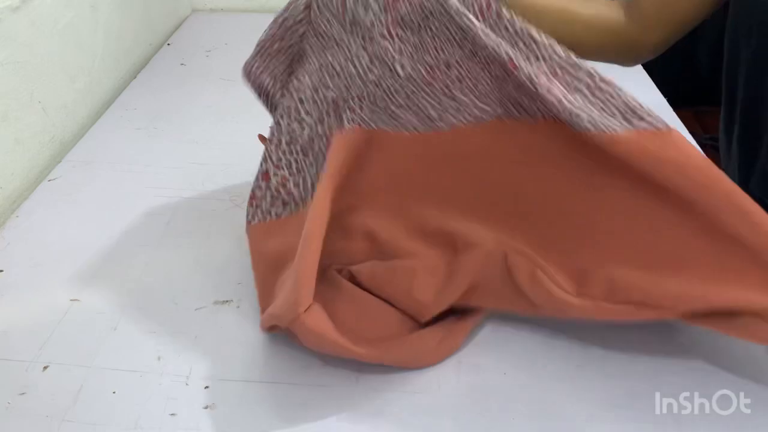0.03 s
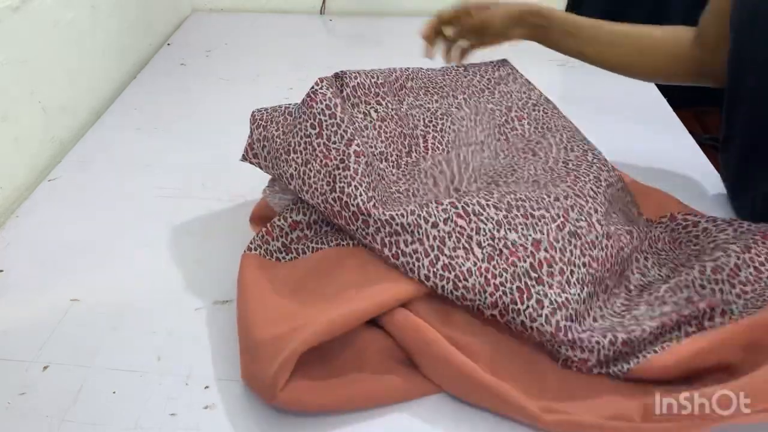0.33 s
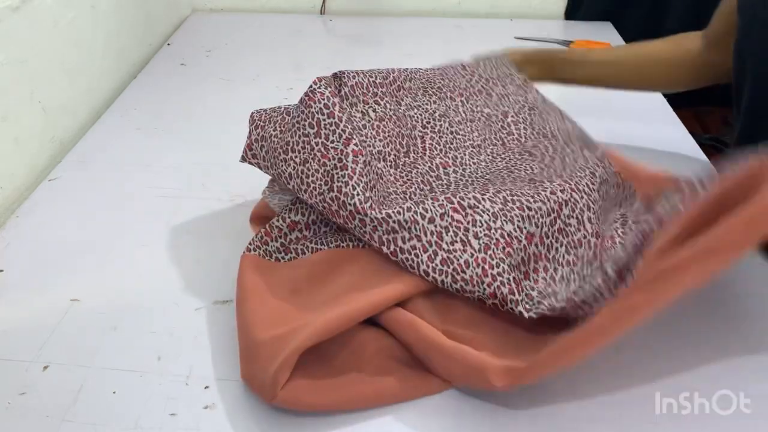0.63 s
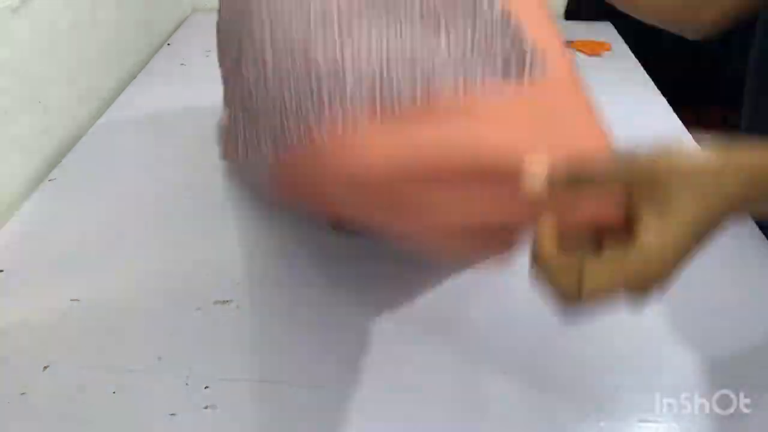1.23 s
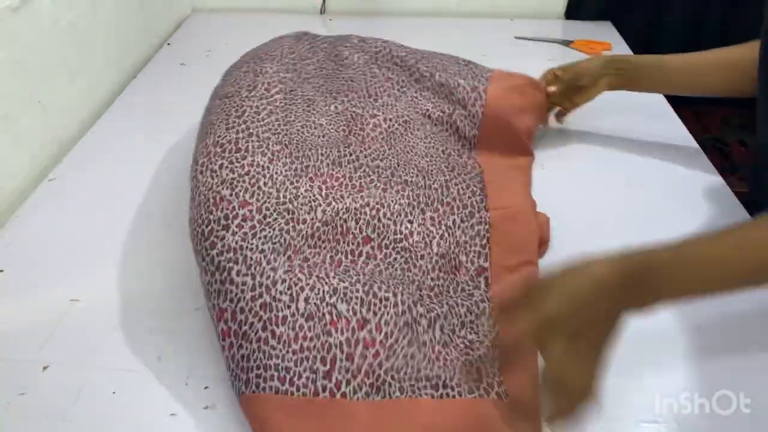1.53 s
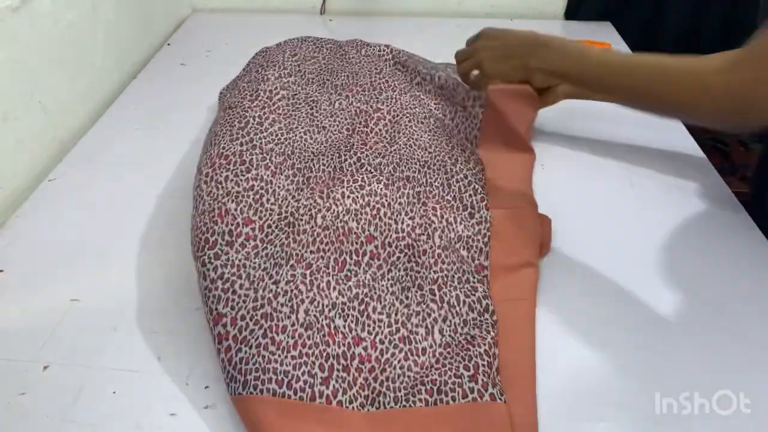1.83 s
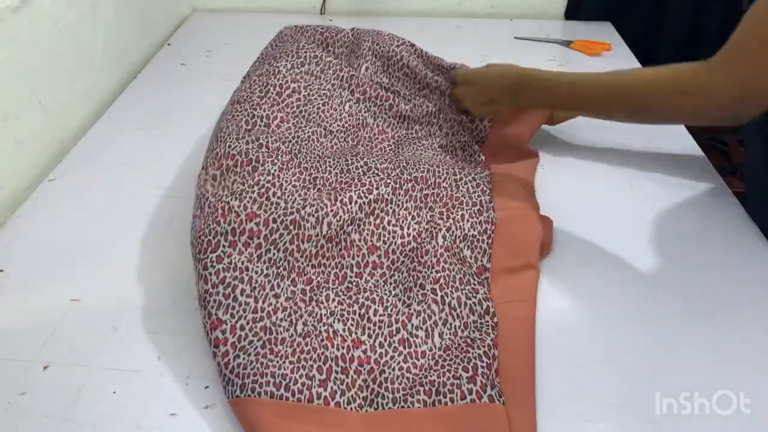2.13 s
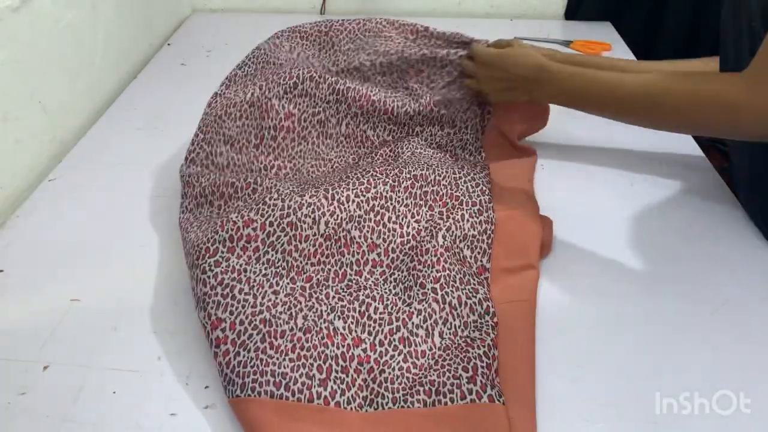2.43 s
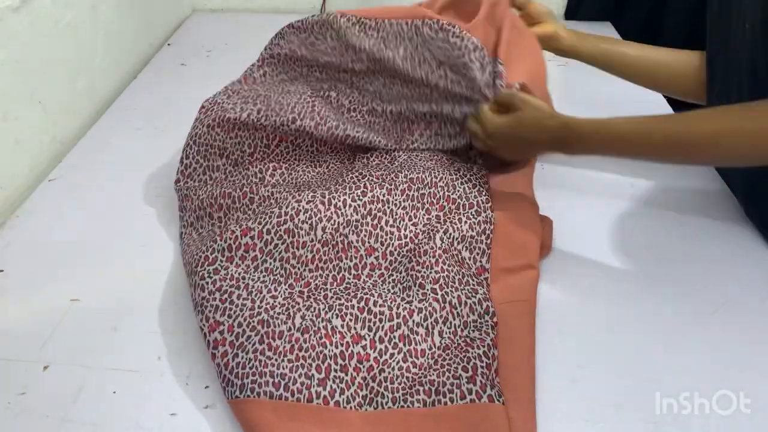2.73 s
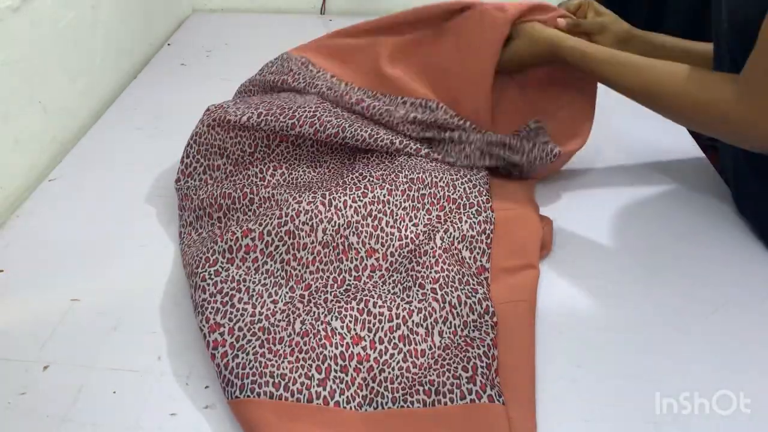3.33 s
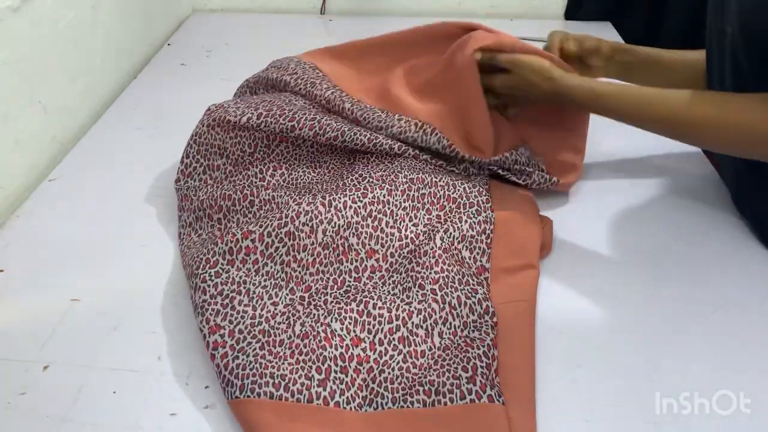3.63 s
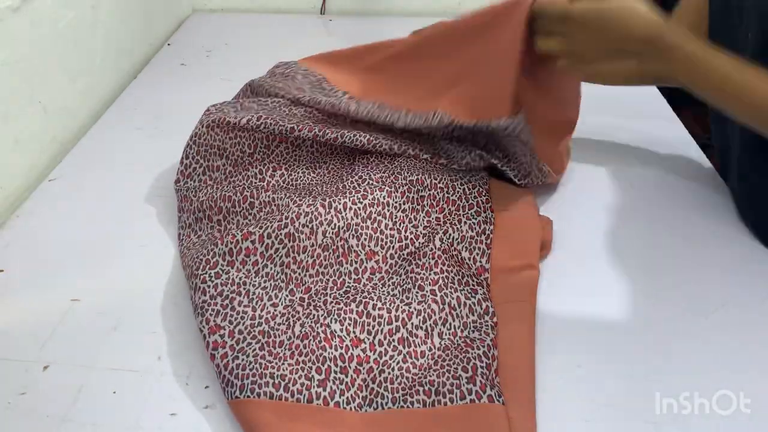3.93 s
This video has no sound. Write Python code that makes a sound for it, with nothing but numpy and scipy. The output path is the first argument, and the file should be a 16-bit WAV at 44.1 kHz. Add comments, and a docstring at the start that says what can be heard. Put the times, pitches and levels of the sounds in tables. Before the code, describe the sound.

Cloth rustles close to the microphone as it is lifted, shaken out with a few quick flaps and dropped on a table, then smoothed by hand. The room is small and quiet, with a low engine drone outside.

```python
"""Sliding threads hiss and moving folds flutter as a cloth is lifted near a stereo microphone.
It is shaken out, dropped on a table and smoothed by hand in a small, quiet room; the sheet pushes
out pulses of air, flapping as it snaps taut and lands. Farther off, a low drone, probably an engine
outside, swells and fades through the walls over soft room noise."""
import sys
import numpy as np
from scipy import signal
from scipy.fft import rfft, irfft
from scipy.io import wavfile
from scipy.ndimage import uniform_filter1d

SR = 44100
rng = np.random.default_rng(int(sys.argv[2]) if len(sys.argv) > 2 else 0)


def pcm_store(signal):
    """Save signal as 16-bit PCM."""
    levels = np.round(np.clip(np.atleast_2d(signal), -1, 1) * 32767)
    wavfile.write(sys.argv[1], SR, levels.astype(np.int16).T)


N = 176400
BIN_HZ = np.fft.rfftfreq(N, 1 / SR)


# The crack of the weave. Each row: frequency in Hz, relative level in dB.
CRACK_SPECTRUM = [(300, 1), (1400, 8), (2700, -4), (4000, 7.5), (5500, -10), (7700, -16), (9700, -11),
                  (13000, -29), (15500, -25)]
# Flaps and pats near the microphone. Each row: start in seconds, relative level in dB,
# starting pitch in Hz, crack against the flap in dB, left over right in dB.
FLAP_HITS = [(0.641, -36, 1120, -13, 1), (.904, -31.5, 890, -22, -3), (0.920, -37.5, 1160, -24, 6),
             (0.935, -31.5, 417, -34, -1), (1.172, -35.5, 1399, -20, 3), (1.310, -39, 1700, -20, 6),
             (1.3367, -21.5, 1240, -35, 2), (1.344, -29, 380, -16, -3), (1.4682, -16.5, 1530, -16.5, 1.5),
             (1.481, -28, 1100, -10.5, -2), (1.4837, -20.5, 242, -32, 0), (1.933, -42.5, 1500, -24, 3),
             (2.678, -24, 277, -38, -2), (3.949, -34.5, 517.6, -41, -4)]

def flaps():
    """Each flap pushes out a pulse of air that falls in pitch, with a brief crack of the weave."""
    attack_s, decay_s, crack_s = .0003, .0028, .0012
    sag_s, end_hz = .0015, 140
    out, t = np.zeros((2, N + SR)), np.arange(SR // 20) / SR
    envelope = (1 - np.exp(-t / attack_s)) * np.exp(-t / decay_s)
    weave = unit(colour(rng.standard_normal(N), CRACK_SPECTRUM))
    for start, db, start_hz, crack_db, pan_db in FLAP_HITS:
        i = int(start * SR)
        pitch = end_hz + (start_hz - end_hz) * np.exp(-t / sag_s)
        push = np.sin(2 * np.pi * np.cumsum(pitch) / SR) * envelope
        crack = undb(crack_db) * np.roll(weave, -i)[:len(t)] * np.exp(-t / crack_s)
        sides_db = np.array([[pan_db], [-pan_db]]) / 2
        out[:, i:i + len(t)] += (push + crack) * undb(db - 2 + sides_db)
    low_cut = signal.butter(2, 80, "high", fs=SR, output="sos")  # the flaps carry little bass
    return signal.sosfilt(low_cut, out[:, :N])


# The dull tone of the folds. Each row: frequency in Hz, relative level in dB.
FLUTTER_SPECTRUM = [(20, -34), (50, -7.5), (120, 6.5), (220, 0.5), (330, -1), (470, -2), (620, -8.5),
                    (1000, -10.5), (1500, -15), (2200, -19), (4000, -28.5), (6000, -36), (12000, -55)]
# How strongly the folds move. Each row: time in seconds, relative level in dB.
FOLD_LEVELS = [(0, -58.5), (.25, -59.5), (.58, -60), (.66, -49), (.76, -54), (.8, -54.5), (.86, -53),
               (.92, -50), (1, -57), (1.13, -61.5), (1.2, -53), (1.29, -51), (1.325, -42), (1.348, -40.5),
               (1.375, -43.5), (1.4, -48), (1.435, -48.5), (1.472, -45), (1.497, -44), (1.55, -54),
               (1.65, -63), (2.62, -60.5), (2.69, -47.5), (2.79, -66), (3.1, -69), (3.32, -55.5),
               (3.45, -75), (3.8, -86), (3.95, -71), (4, -66)]
# The folds across the microphone pair. Each row: frequency in Hz, left-right correlation.
FOLD_CORRELATION = [(100, 0.99), (300, 0.96), (700, 0.6), (2000, 0.33), (6000, 0.13)]

def folds():
    """Creases buckle in dull little pops as the folds move."""
    pops = spread(grains(per_s=2200, scatter_db=1.5), FOLD_CORRELATION)
    flutter = unit(colour(pops, FLUTTER_SPECTRUM))
    return flutter * undb(curve(FOLD_LEVELS) + .5 + 2 * walk(per_s=50))


# The threads across the microphone pair. Each row: frequency in Hz, left-right correlation.
THREAD_CORRELATION = [(1000, 0.15), (4000, 0.061), (6500, 0.063), (9000, 0.11), (12000, 1)]

def threads(lag_s=.000295):
    """Dense slips of thread on thread; the left channel runs a fixed moment behind the right."""
    left, right = spread(grains(per_s=9000, scatter_db=1.5), THREAD_CORRELATION)
    return np.array([np.roll(left, round(lag_s * SR)), right])


# The hiss at close range. Each row: frequency in Hz, relative level in dB.
HISS_SPECTRUM = [(500, 6.5), (1200, 2), (2500, 4), (4000, 2), (5500, -0.5), (8000, -0.5), (10500, 0.5),
                 (13500, 0.5), (15500, -4.5)]
# Cloth sliding on cloth and table. Each row: time in seconds, relative level in dB.
SLIDE_LEVELS = [(0, -64.5), (.1, -65), (.33, -70), (.42, -76.5), (.56, -74.5), (.73, -62.5), (.93, -61.5),
                (1.05, -62), (1.15, -70.5), (1.23, -66.5), (1.34, -63), (1.41, -68.5), (1.48, -64),
                (1.56, -76), (1.78, -86), (1.85, -75), (1.88, -73), (1.929, -73.5), (1.935, -66.5),
                (1.965, -63.5), (2.06, -71.5), (2.19, -70.5), (2.3, -75.5), (2.59, -80.5), (2.66, -69.5),
                (2.705, -56.5), (2.8, -71.5), (2.9, -79), (3.02, -84), (3.18, -76.5), (3.31, -67),
                (3.43, -71.5), (3.49, -65), (3.55, -72), (3.8, -81), (3.92, -70), (4, -72)]

def sliding(sheen_hz=10200, sheen_rest_db=-64.5):
    """Cloth slides in a slightly uneven hiss; faster sliding is louder and lifts the top."""
    hiss = unit(colour(threads(), HISS_SPECTRUM))
    level_db = curve(SLIDE_LEVELS)
    sheen = irfft(rfft(hiss) / (1 + (sheen_hz / (BIN_HZ + 1)) ** 10), N)
    sheen_gain = undb(.96 * (level_db - sheen_rest_db))
    hiss = hiss + sheen * (sheen_gain - 1)
    return hiss * undb(level_db + 5 + 1.2 * walk(per_s=45))


# Cushions of air under the sheet.
# Each row: middle in seconds, half-length in seconds, level in dB, centre in Hz.
BILLOW_PUFFS = [(0.712, 0.027, -54, 418), (0.804, 0.031, -41.5, 198), (1.351, 0.04, -41, 455),
                (1.407, 0.031, -41, 370), (1.508, 0.026, -50, 278), (2.715, 0.048, -46.5, 258),
                (3.354, 0.11, -61, 351.4), (3.868, 0.048, -59.5, 440), (3.95, 0.02, -52.5, 400)]

def billows():
    """Air escapes under the falling sheet in soft, hollow puffs."""
    wind = spread(rng.standard_normal((2, N)), FOLD_CORRELATION)
    return sum(band(wind, hz, octaves=.51) * undb(db) * swell(middle, half_s)
               for middle, half_s, db, hz in BILLOW_PUFFS)


# A fold dragged under the hand.
# Each row: middle in seconds, half-length in seconds, level in dB, scatter of slip sizes in dB.
FOLD_DRAGS = [(.66, 0.034, -57, 1.6667), (.8, 0.028, -60, 4.6), (0.915, 0.035, -59, 7),
              (1.374, 0.047, -53.5, 3), (2.703, 0.055, -54.5, 1.9)]

def drags():
    """A pinched fold sticks and slips: uneven slips crumple, even ones swish."""
    out = 0
    for middle, half_s, db, scatter_db in FOLD_DRAGS:
        slips = spread(grains(per_s=2200, scatter_db=scatter_db), FOLD_CORRELATION)
        out += band(slips, hz=1270, octaves=1) * undb(db) * swell(middle, half_s)
    return out


# The tone of cloth on the tabletop. Each row: frequency in Hz, relative level in dB.
BRUSH_SPECTRUM = [(600, -9), (1500, 5.5), (2600, -5), (4100, 4), (5500, -6), (9000, -27), (15000, -24)]
# Quick strokes across it. Each row: middle in seconds, half-length in seconds, level in dB.
BRUSH_STROKES = [(1.346, 0.012, -57), (1.452, 0.018, -54), (1.483, 0.023, -52), (2.691, 0.08, -73),
                 (3.268, 0.22, -73), (3.494, 0.038, -68)]

def brushes():
    """The sheet skims the table in short swishes, duller than the hiss."""
    rub = unit(colour(threads(), BRUSH_SPECTRUM))
    return rub * sum(undb(db) * swell(middle, half_s) for middle, half_s, db in BRUSH_STROKES)


# Faint squeaks at the table. Each row: middle in seconds, half-length in seconds, level in dB.
SQUEAK_SWELLS = [(0.493, 0.076, -70), (0.577, 0.042, -66), (0.644, 0.02, -66)]

def squeaks(hz=3120, width_hz=120):
    """A thin, rough tone comes and goes just before the cloth is lifted."""
    peak = np.exp(-((BIN_HZ - hz) / width_hz) ** 2)
    tone = unit(irfft(rfft(rng.standard_normal((2, N))) * peak, N))
    return tone * sum(undb(db) * swell(middle, half_s) for middle, half_s, db in SQUEAK_SWELLS)


def room(x, t60_s=.3, gap_s=.011, damp_hz=4000):
    """The small room returns a short, diffuse ring, different at each microphone."""
    t = np.arange(SR // 2) / SR
    tail = rng.standard_normal((2, len(t))) * undb(-60 * t / t60_s) * (t > gap_s)
    tail /= np.sqrt(np.sum(tail[0] ** 2))
    tail = signal.sosfilt(signal.butter(1, damp_hz, fs=SR, output="sos"), tail)
    ring = signal.fftconvolve(x, tail, axes=1)[:, :N]
    return undb(-6.5) * spread(ring, ROOM_CORRELATION) / np.sqrt(2)


# The speed of the engine outside. Each row: time in seconds, firings per second.
ENGINE_SPEED = [(0, 38), (.5, 35), (.8, 33), (1.27, 33.2), (1.58, 28.9), (1.74, 29.3), (1.85, 36),
                (2.2, 29.3), (2.35, 27.3), (2.52, 25.5), (2.9, 28), (3.15, 29.4), (3.33, 28), (3.5, 27.2),
                (3.75, 30.2), (4, 28.3)]
# Its second to fifth partials, heard from indoors. Each row: time in seconds, relative level in dB.
PARTIAL_2 = [(0, -80), (1.68, -57), (1.85, -46.5), (2, -73), (2.17, -45), (2.4, -80), (3.63, -67.5),
             (3.75, -50), (4, -50.5)]
PARTIAL_3 = [(0, -51.5), (.17, -53.5), (.3, -78), (.6, -56.5), (1.2, -60), (1.85, -58.5), (2.06, -49.5),
             (2.15, -58), (2.25, -51), (2.4, -61), (3.5, -66), (3.7, -48.5), (4, -62)]
PARTIAL_4 = [(0, -50.5), (.1, -52), (.24, -68), (.42, -49.5), (.6, -67), (2.08, -52.5), (2.21, -39.5),
             (2.33, -56), (2.65, -49.5), (3, -54.5), (3.36, -45), (3.42, -58), (3.48, -45), (3.56, -55.5),
             (4, -58)]
PARTIAL_5 = [(0, -57.5), (.35, -64), (.56, -46.5), (.65, -54.5), (.8, -49.5), (1.05, -56.5), (1.25, -52.5),
             (1.57, -54), (1.66, -40), (1.73, -41), (1.8, -52.5), (2.05, -59), (2.27, -45.5), (2.5, -55.5),
             (3.02, -60.5), (3.19, -42.5), (3.32, -43), (3.43, -57), (4, -78)]

def drone(waver_db=1.5):
    """Only the low partials of the engine pass the walls; each swells and fades on its own."""
    firing_hz = curve(ENGINE_SPEED) * (1 + .0031 * walk(per_s=12.55))
    phase = 2 * np.pi * np.cumsum(firing_hz) / SR
    out = 0
    for k, levels in enumerate([PARTIAL_2, PARTIAL_3, PARTIAL_4, PARTIAL_5], start=2):
        tone = np.sqrt(2) * np.sin(k * phase + 2 * np.pi * rng.random())
        out += tone * undb(curve(levels) - .58 + waver_db * walk(per_s=20))
    return out


# The quiet room itself. Each row: frequency in Hz, relative level in dB.
ROOM_SPECTRUM = [(20, -37.5), (35, -6.5), (58, 7.5), (78, 0.5), (110, 7.5), (150, 7), (220, -5),
                 (370, -4.5), (480, -10), (660, -13), (810, -6.5), (950, -12), (1150, -8), (1500, -12.5),
                 (2100, -19), (3600, -31), (6000, -44), (9000, -45.5), (14000, -46)]
# The room across the microphone pair. Each row: frequency in Hz, left-right correlation.
ROOM_CORRELATION = [(60, 1), (130, 0.65), (250, .8), (500, 0.18), (1000, 0.039), (3000, 0.018)]

def room_tone(level_db=-51):
    """A nearly steady rumble and soft noise surround the microphone."""
    noise = spread(rng.standard_normal((2, N)), ROOM_CORRELATION)
    return unit(colour(noise, ROOM_SPECTRUM)) * undb(level_db + .5 * walk(per_s=5.13))


def undb(db):
    """Decibels to gain."""
    return 10 ** (np.asarray(db) / 20)


def unit(x):
    """Scale to rms 1."""
    return x / np.sqrt(np.mean(x ** 2))


def curve(rows):
    """Rows of (s, value) joined by straight lines."""
    return np.interp(np.arange(N) / SR, *np.array(rows).T)


def swell(middle, half_s):
    """Smooth rise and fall about a moment."""
    return np.cos(np.pi / 2 * np.clip((np.arange(N) / SR - middle) / half_s, -1, 1)) ** 2


def per_bin(rows):
    """Rows of (Hz, value) joined on a log-frequency axis."""
    hz, value = np.array(rows).T
    return np.interp(np.log(BIN_HZ + 1), np.log(hz), value)


def colour(x, spectrum):
    """Minimum-phase filter with the given (Hz, dB) shape."""
    cepstrum = irfft(np.log(undb(per_bin(spectrum))), N)
    cepstrum[1:N // 2] *= 2
    cepstrum[N // 2 + 1:] = 0
    return irfft(rfft(x) * np.exp(rfft(cepstrum)), N)


def band(x, hz, octaves):
    """A bell-shaped band of x about hz, at rms 1."""
    bell = np.exp(-(np.log2((BIN_HZ + 1) / hz) / octaves) ** 2)
    return unit(irfft(rfft(x) * bell, N))


def spread(pair, correlation):
    """Mix two unrelated signals to left and right with a given correlation per band."""
    c = np.clip(per_bin(correlation), -.99, .99)
    mid, side = irfft(rfft(pair) * np.sqrt([1 + c, 1 - c]), N)
    return np.array([mid + side, mid - side])


def walk(per_s):
    """Smooth random wander at rms 1."""
    hold = int(SR / per_s)
    steps = np.repeat(rng.standard_normal(N // hold + 1), hold)
    return unit(uniform_filter1d(uniform_filter1d(steps, hold), hold)[:N])


def grains(per_s, scatter_db):
    """Two unrelated streams of tiny random impacts of uneven size."""
    pair = []
    for _ in range(2):
        impacts = (rng.random(N) < per_s / SR) * rng.standard_normal(N)
        pair.append(unit(impacts * undb(scatter_db * rng.standard_normal(N))))
    return np.array(pair)


def scene():
    """The cloth up close, the room around it and the engine beyond the walls."""
    cloth = sliding() + folds() + flaps() + billows() + drags() + brushes() + squeaks()
    return cloth + room(cloth) + drone() + room_tone()


def record(dry, top_hz=15400):
    """The highest treble is cut steeply."""
    return signal.sosfilt(signal.ellip(8, .2, 70, top_hz, fs=SR, output="sos"), dry)


dry = scene()
out = record(dry)
pcm_store(out)
```